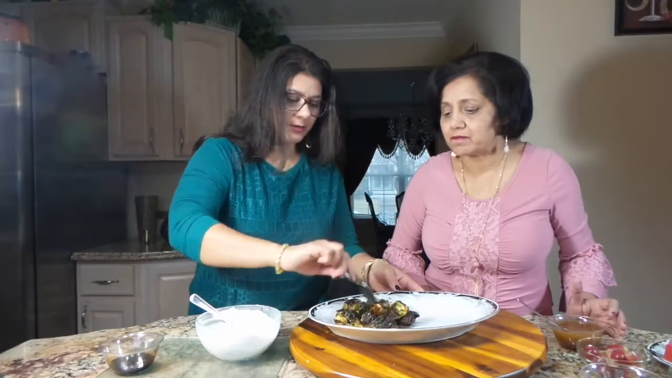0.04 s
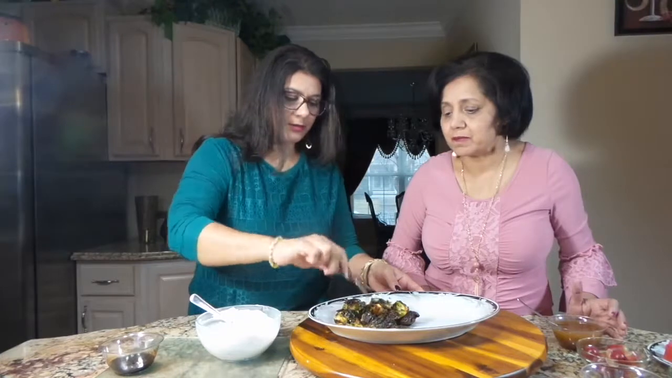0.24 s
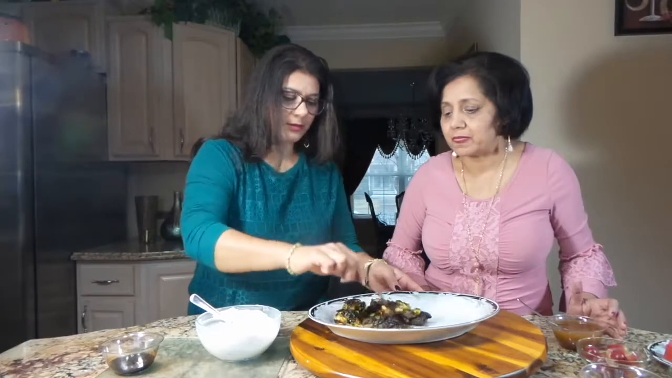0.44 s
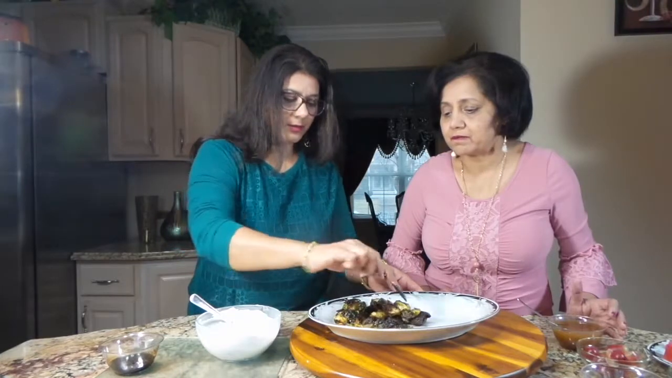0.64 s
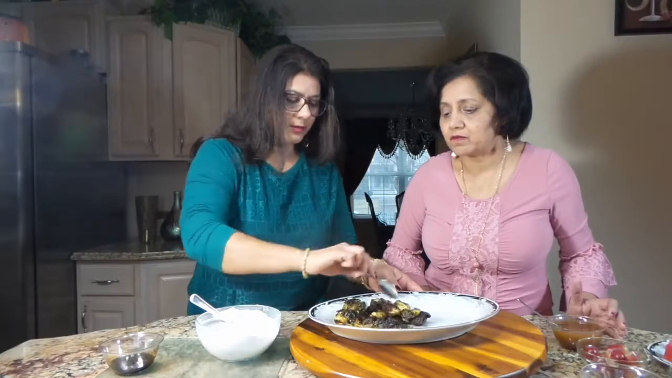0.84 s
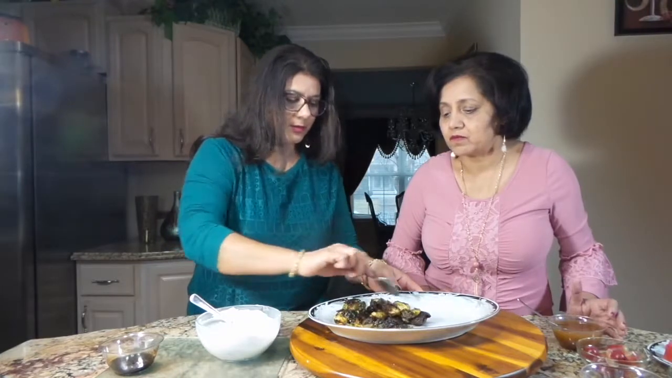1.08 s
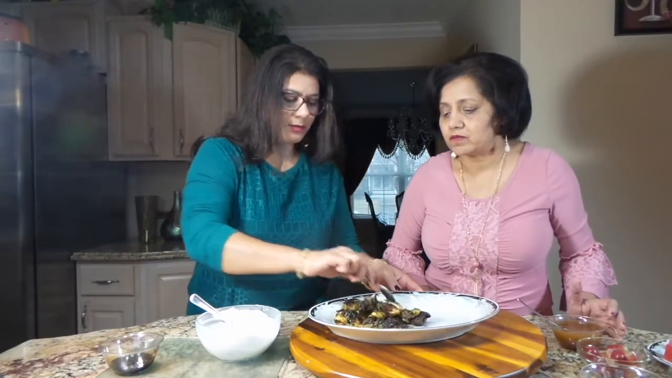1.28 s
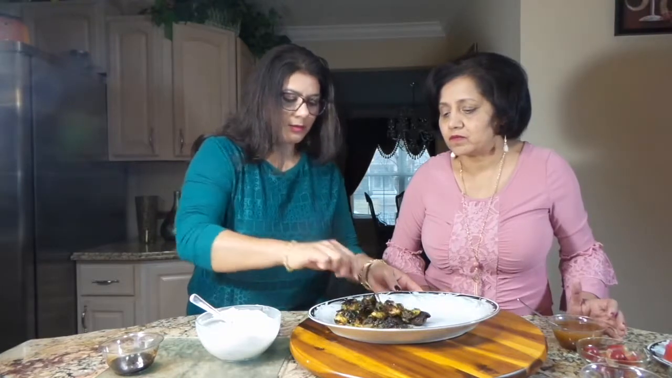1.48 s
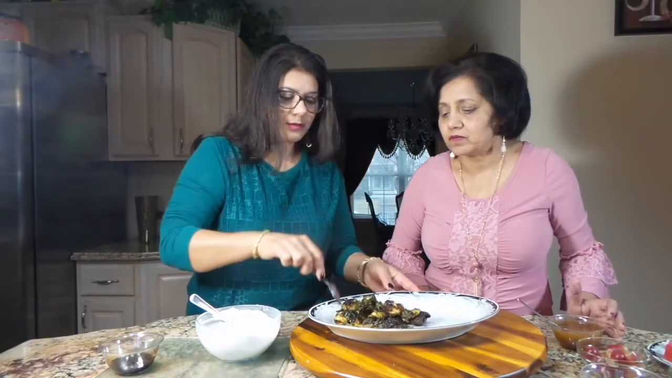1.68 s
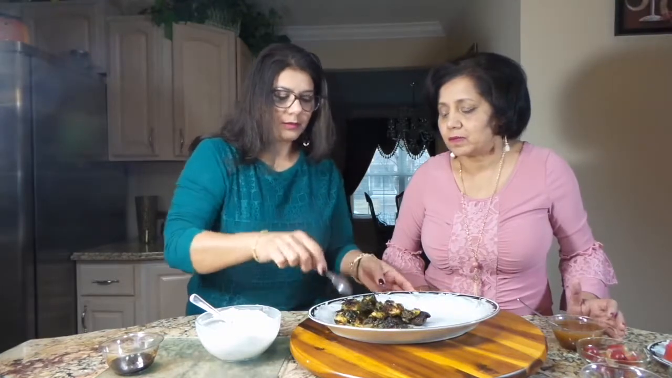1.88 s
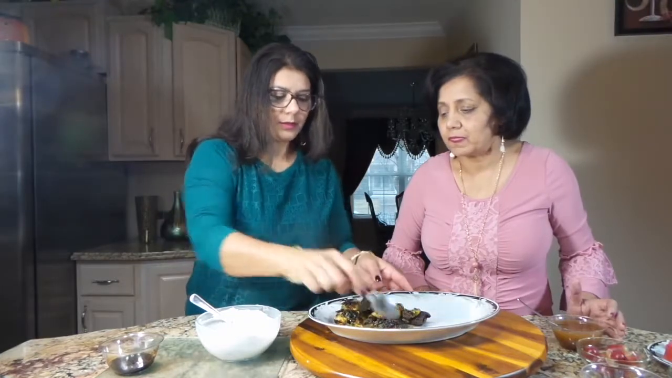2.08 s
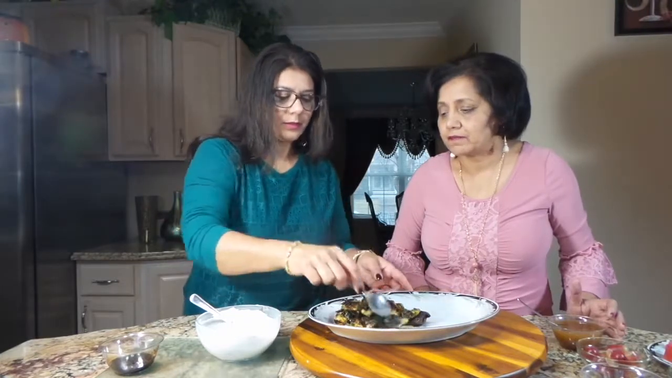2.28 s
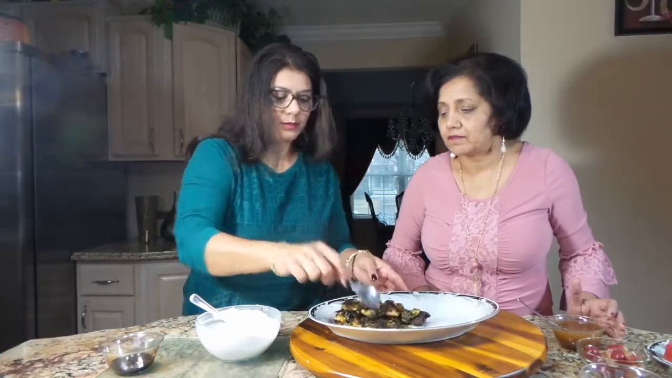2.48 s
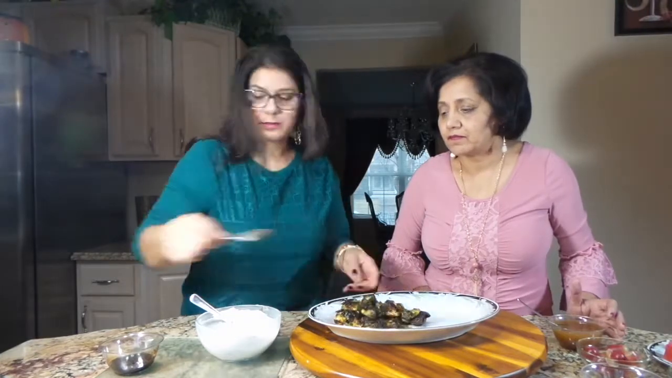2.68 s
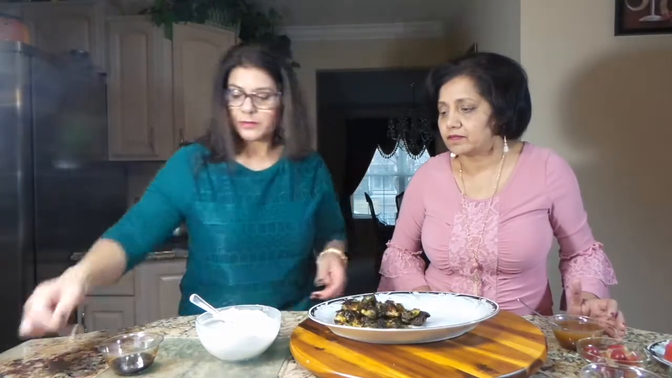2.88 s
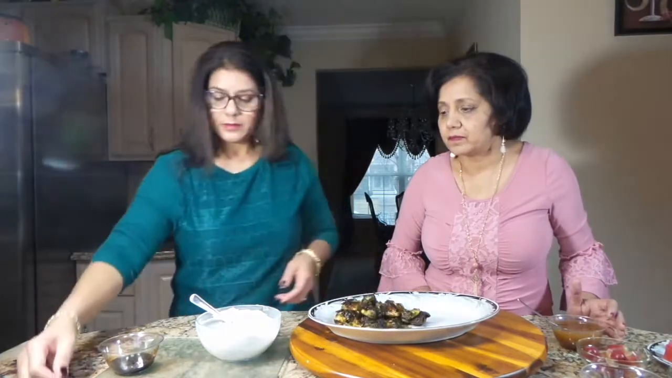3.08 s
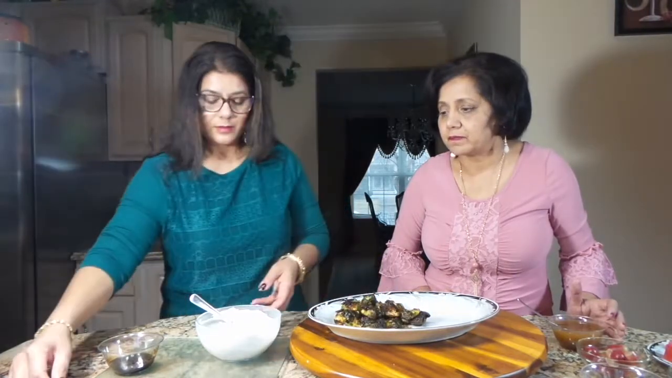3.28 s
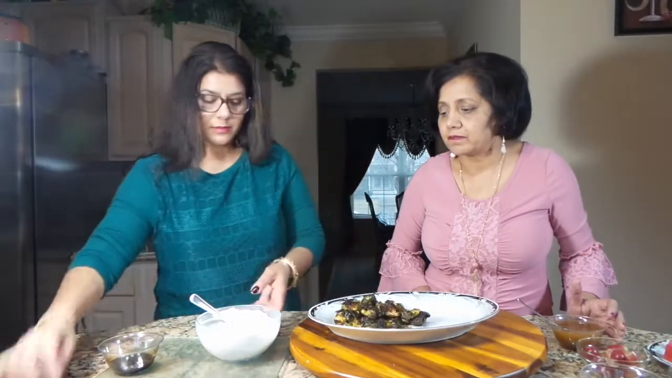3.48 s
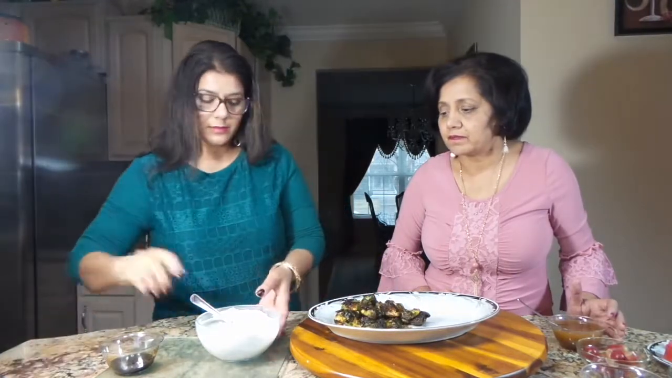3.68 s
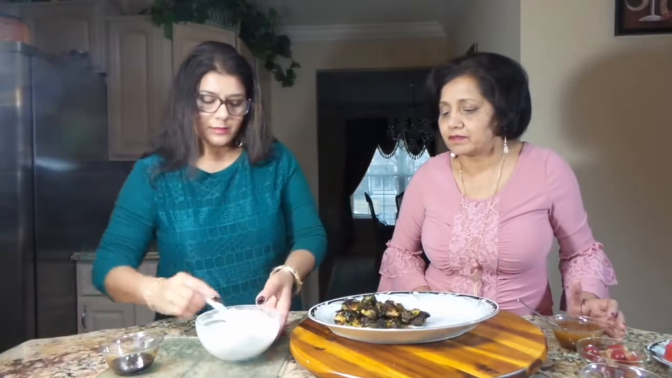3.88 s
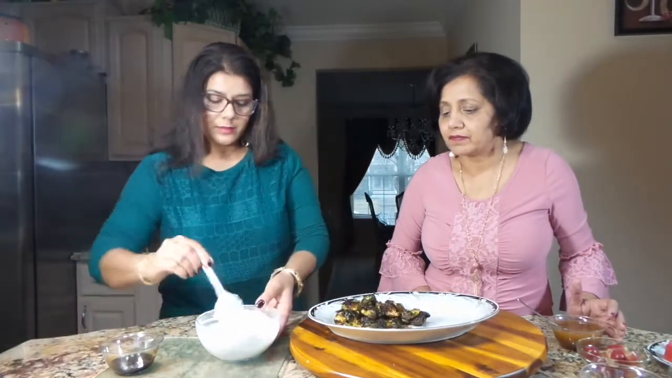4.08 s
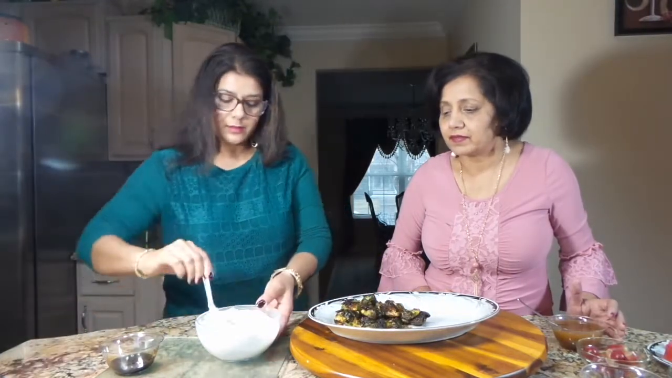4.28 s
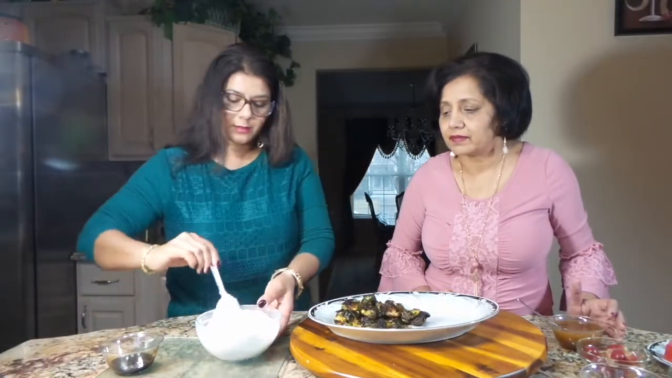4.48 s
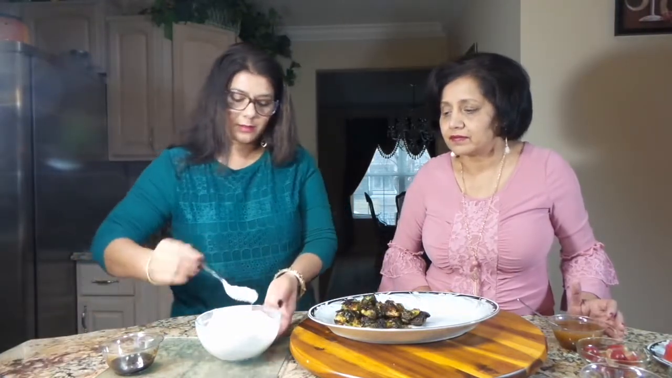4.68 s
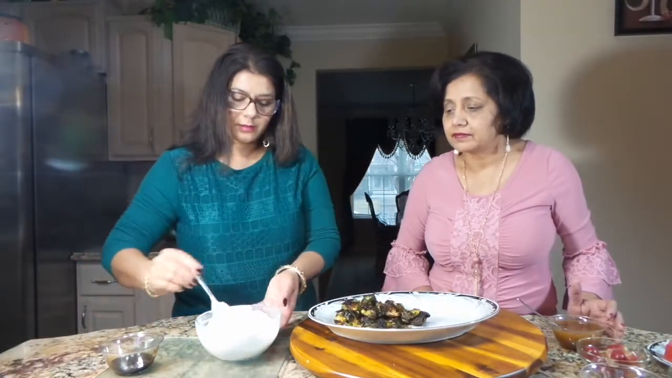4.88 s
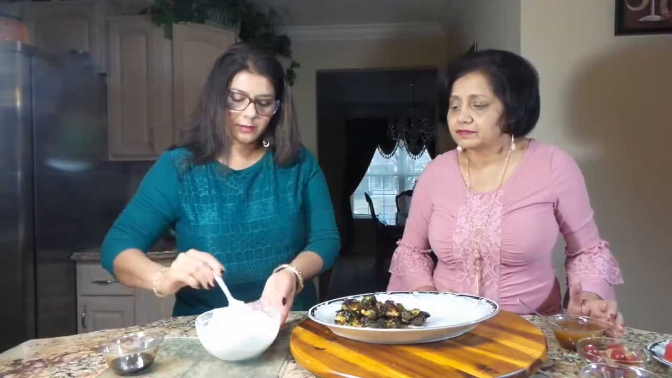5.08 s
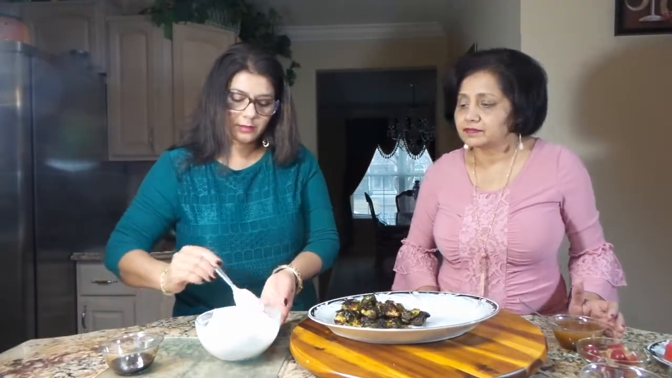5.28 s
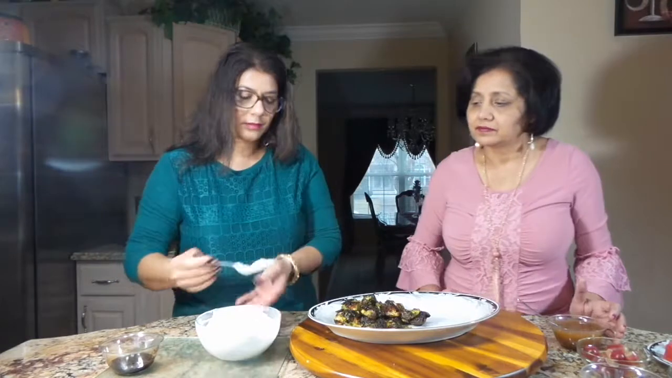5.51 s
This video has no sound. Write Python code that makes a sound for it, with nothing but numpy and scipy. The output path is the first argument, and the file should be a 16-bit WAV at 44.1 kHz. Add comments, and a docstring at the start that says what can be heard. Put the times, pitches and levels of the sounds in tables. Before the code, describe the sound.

In a quiet live kitchen, heard from a few steps away and nearly mono, a metal spoon clinks brightly on a ceramic platter about once a second, with soft moist food rustles between. The spoon then drops on a stone counter, bouncing and rattling sharply to rest, the loudest event. Faint small-spoon taps and short scrapes in a sauce bowl follow over low room rumble.

```python
"""A live kitchen, heard almost in mono from a few steps away: a steel serving spoon knocks food off
onto a large ceramic platter, then is dropped on a stone counter, where it rattles to rest.
A smaller spoon scoops sauce in a hand-held bowl. Soft food rustles and bumps lie between the blows.
Struck things are damped modes plus a crack of coloured noise; food and scraping are streams of uneven
grains. Everything but the room air passes through a diffuse kitchen reverberation."""
import sys
import numpy as np
from scipy import signal
from scipy.fft import rfft, irfft, next_fast_len
from scipy.io import wavfile
from scipy.ndimage import uniform_filter1d, minimum_filter1d

SR = 44100
rng = np.random.default_rng(int(sys.argv[2]) if len(sys.argv) > 2 else 0)


def wrap_up_sound(samples):
    """Save the sound to the file named by the first command line argument, as 16-bit audio."""
    columns = np.atleast_2d(samples).T
    # keep every value between -1 and 1, then stretch to whole-number steps
    tamed = np.clip(columns, -1, 1)
    steps = np.round(tamed * 32767).astype(np.int16)
    wavfile.write(sys.argv[1], SR, steps)


N = 244679

# Ringing modes of the ceramic platter. Each row: frequency in Hz, undamped t60 in seconds,
# relative level in dB when struck on the rim, the same in dB when struck in the well.
PLATTER_MODES = [(781, .14, -13, 0), (860, .05, -14, -7), (1020, .05, -14, -14), (1569, .24, -4, -3),
                 (1590, .16, -9, -14), (1616, .18, -14, -4), (2402, .12, -3, -15), (2458, .15, 3, -5),
                 (2982, .07, -11, -24), (3391, .3, 1, -5), (4413, .18, -4, -10), (5521, .22, -4, -8),
                 (6709, .18, -4, -27), (7981, .2, -4, -23), (8645, .2, -18, -10), (9304, .16, -7, -17),
                 (10260, .1, -16, -18), (10705, .16, -10, -16), (11810, .08, -15, -11),
                 (12190, .14, -15, -19), (13770, .1, -15, -24), (14840, .05, -5, -6)]
# Contact crack on the platter. Each row: frequency in Hz, spectrum in dB per Hz.
PLATTER_CRACK = [(40, -50.5), (150, -28), (420, -23), (700, 18), (1050, -3), (1300, -7.5), (1750, 7),
                 (2800, -12.5), (3900, -1.5), (4800, 6), (7000, 0.5), (13000, 6), (15500, 2.5)]
# Spoon blows on the platter. Each row: start in seconds, ring level in dB, crack level in dB,
# place from 0 (rim) to 1 (well), contact cut-off in Hz.
PLATTER_BLOWS = [(-.14, -35, -27.5, 0, 10500), (.9120, -32, -30.5, 0.078, 16000),
                 (2.2106, -35, -33, 1, 19400)]
PLATTER_THUD_HZ, PLATTER_THUD_DB = 240, -27  # the board under the platter, level against the crack

# Bending modes of the serving spoon's handle. Each row: frequency in Hz, t60 in seconds, relative level in dB.
HANDLE_MODES = [(410, .15, -8), (740, .05, -13), (1058, .1, -4), (1400, .08, -9), (1665, .1, -6),
                (2100, .06, -4), (2270, .06, -1), (2490, .08, -5), (2740, .1, -4), (3105, .1, -6),
                (3490, .08, 0), (3812, .08, 2), (3968, .08, -5), (4400, .08, -3), (4830, .1, -6),
                (5325, .13, -3), (5620, .12, -9), (6260, .08, -7), (6525, .13, -8), (7305, .16, -8),
                (7742, .15, -4), (8147, .13, -7), (8560, .13, -6)]
# Shell modes of the spoon's cup. Each row: frequency in Hz, undamped t60 in seconds, relative level in dB.
CUP_MODES = [(10247, .07, -3), (10465, .07, -9), (11310, .07, -15), (11828, .1, -2), (13910, .04, 0),
             (14050, .04, -10), (14712, .05, -8), (14834, .05, -6)]
# Contact crack of steel on stone. Each row: frequency in Hz, spectrum in dB per Hz.
STONE_CRACK = [(150, -30), (340, -22), (600, -4.5), (1100, 3.5), (1600, 0.5), (2600, 3), (3800, 8.5),
               (5000, 5.5), (8000, 3), (10000, -3.5), (15000, -8.5)]
# Landings of the dropped spoon. Each row: start in seconds, clack level in dB, cup ring level in dB,
# most excited frequency in Hz, lower edge of the sound in Hz, contact cut-off in Hz.
SPOON_LANDINGS = [(3.1560, -33.5, -39, 2303, 450, 13100), (3.171, -36.5, -48.5, 2259, 1000, 5040),
                  (3.2123, -30, -53.5, 5316, 400, 5530), (3.2215, -26.5, -56.5, 2564, 385, 5005),
                  (3.455, -37.5, -66.5, 3740, 501.6, 3475), (3.4627, -21.5, -19, 3974, 3305, 17570),
                  (3.4855, -23.5, -34.5, 2452, 403.7, 9760), (3.507, -29, -30, 1093, 400, 4000),
                  (3.5135, -19.5, -28.5, 4456, 500, 9015), (3.5215, -28, -25.5, 1196, 505, 12040),
                  (3.5570, -23.5, -15.5, 7735, 1200, 16080)]
# Rocking from side to side after a landing. Each row: start in seconds, length in seconds,
# first gap in seconds, first clack level in dB, first cup ring level in dB,
# centre of the most excited frequency in Hz, contact cut-off in Hz.
SPOON_ROCKS = [(3.27, .075, .031, -36.5, -64, 1900, 3188), (3.5305, .128, .0145, -29, -19.5, 4613, 11350)]
HANDLE_BODY_DB, HANDLE_BODY_HZ = 5.5, 900  # the whole handle bends and lifts the modes below this
COUNTER_THUD_HZ, COUNTER_THUD_DB = 136, -30.5  # the counter under the spoon, level against the clack
ROCK_GAP_KEPT = 0.99  # share of the gap kept from swing to swing, before the unevenness
ROCK_FADE_DB_PER_S, CUP_FADE_DB_PER_S = 56.5, 115
ROCK_FOCUS_OCTAVES, ROCK_EDGE_HZ = 0.33, 640  # scatter of the most excited pitch, lower edge of the sound

# Sauce bowl, damped by hand and sauce. Each row: frequency in Hz, t60 in seconds, relative level in dB.
BOWL_MODES = [(721, .03, -9), (904, .04, -6), (1065, .05, -11), (2150, .04, -4), (2270, .08, 4),
              (2410, .03, -6), (3080, .03, -15), (4020, .04, -12), (4500, .02, -16), (5600, .03, -13),
              (5960, .04, -12), (8055, .03, -18)]
# Contact crack in the bowl. Each row: frequency in Hz, spectrum in dB per Hz.
BOWL_CRACK = [(60, -11), (420, -11.5), (780, 19), (1450, -5.5), (2400, 10.5), (3200, 1.5), (5800, -0.5),
              (9000, -9), (15000, -9.5)]
# Small spoon tapping the bowl. Each row: start in seconds, ring level in dB, crack level in dB.
BOWL_TAPS = [(4.507, -70.5, -70), (4.572, -79, -69.5), (4.648, -53, -58), (4.6670, -70, -59.5),
             (5.2376, -55, -50.5), (5.3290, -58.5, -62), (5.3635, -60.5, -57.5)]
# Scoops along the bowl's wall. Each row: start in seconds, length until release in seconds, level in dB.
SCOOPS = [(4.513, 0.122, -69), (4.628, 0.028, -53), (4.67, 0.029, -65), (5.253, 0.11, -54.5)]
SCOOP_ATTACK_S, SCOOP_RELEASE_S = 0.013, 0.013

# Moist food sliding and dropping. Each row: peak of the swell in seconds, rise in seconds (the fall is
# as long), level in dB, treble tilt in dB per octave.
RUSTLES = [(0.122, 0.059, -46, -2.5), (0.38, 0.11, -59, -1.5), (0.621, 0.016, -65, 1.5),
           (1.319, 0.06, -62.5, -3), (1.83, 0.1, -68, -3.5), (2.449, 0.052, -57, -4.5),
           (4.415, 0.031, -67, 6)]
# Spectrum of the food before the tilt. Each row: frequency in Hz, spectrum in dB per Hz.
FOOD_COLOUR = [(40, -36.5), (200, 0.5), (800, -8), (2500, -2.5), (5000, -2), (9000, -1.5), (15000, 6)]
# Dishes and hands on the board and counter. Each row: start in seconds, frequency in Hz, level in dB.
BUMPS = [(0.03, 124, -58.5), (0.148, 160, -59), (1.80, 243, -62), (1.87, 260, -60), (2.066, 195, -63),
         (2.189, 199, -55), (2.384, 138, -55.5), (3.735, 119, -52.5), (3.954, 1190, -67)]

# Air of the room at the microphone. Each row: frequency in Hz, spectrum in dB per Hz.
AIR_COLOUR = [(15, -49.5), (25, -18.5), (48, -1.5), (107, -2.5), (144, -2.5), (188, -1), (260, -5),
              (297, -2.5), (433, -9.5), (631, -8.5), (1110, -16), (1340, -14), (1620, -20.5), (1750, -20),
              (15500, -26.5)]
AIR_DB = -63.5
# Kitchen reverberation. Each row: band centre in Hz, t60 in seconds.
ROOM_T60 = [(125, .55), (500, .45), (1500, .43), (4000, .38), (8000, .325), (15000, .24)]
TOP_HZ = 15600
BASS_LAG_S = .018  # delay of the averaged loudness that thins the bass
TAIL = 32768  # samples in each struck sound
AGE = np.arange(TAIL) / SR  # seconds since its start


def platter(damping=9, choked_db=-6, free_db=-1, food_damping=0.92):
    """The spoon cracks against the platter; the place of the blow sets the balance of the ringing modes."""
    out = np.zeros(N)
    _, _, rim_db, well_db = np.transpose(PLATTER_MODES)
    for s, ring_db, crack_db, place, cut_hz in PLATTER_BLOWS:
        path = kitchen(direct_db=-12, early_db=-6.0)
        # part of each mode dies at once under the touching spoon, the rest rings freely
        free = ringing(PLATTER_MODES, kitchen(), food_damping)
        choked = ringing(PLATTER_MODES, path, damping)
        rows = undb(free_db) * free + undb(choked_db) * choked
        mode_db = rim_db + np.clip(place, 0, 1) * (well_db - rim_db)
        ring = undb(mode_db) @ rows
        crack = unit(colour(path, PLATTER_CRACK, cut_hz))
        add(out, s, radiate(undb(ring_db) * ring + undb(crack_db) * crack, edge_hz=770))
        add(out, s, undb(crack_db + PLATTER_THUD_DB) * thud(PLATTER_THUD_HZ))
    return out


def dropped_spoon(focus_db=9, focus_octaves=0.33, crack_db=-1, cup_damping=1.25, choked_damping=25, choked_db=-10):
    """The handle bends and clacks on the stone; each blow also rings the cup's high shell modes by its own amount."""
    out, path = np.zeros(N), kitchen(direct_db=-10, early_db=-3, early_t60=.035)
    handle, counter = ringing(HANDLE_MODES, path), thud(COUNTER_THUD_HZ)
    # the stone chokes part of the cup's ring at once
    free_cup = ringing(CUP_MODES, path, cup_damping)
    cup = free_cup + undb(choked_db) * ringing(CUP_MODES, path, choked_damping)
    handle_hz = np.array(HANDLE_MODES)[:, :1]
    body_db = HANDLE_BODY_DB / (1 + (handle_hz / HANDLE_BODY_HZ) ** 4)
    for s, clack_db, cup_db, focus_hz, edge_hz, cut_hz in SPOON_LANDINGS + rocking():
        # the point that touches the stone favours the modes that swing most there
        octaves_off = np.log2(handle_hz / focus_hz)
        favour = undb(body_db + focus_db * np.exp(-(octaves_off / focus_octaves) ** 2))
        softness = np.sqrt(1 + (handle_hz / cut_hz) ** 4)
        bending = unit(blow(HANDLE_MODES, favour * handle / softness))
        crack = unit(colour(path, STONE_CRACK, cut_hz))
        clack = unit(bending + undb(crack_db) * crack)
        sound = undb(clack_db) * clack + undb(cup_db) * unit(blow(CUP_MODES, cup))
        push = undb(clack_db + COUNTER_THUD_DB) * counter
        # the spoon rocks, so blows come from either side: random polarity
        add(out, s, rng.choice([-1, 1]) * (radiate(sound, edge_hz, order=2) + push))
    return out


def rocking(count=16, uneven=.12, scatter_db=3.0):
    """Blows of the rocking spoon: on average ever quicker and weaker, each on a slightly different point."""
    blows = []
    for start, length, gap, clack_db, cup_db, focus_hz, cut_hz in SPOON_ROCKS:
        age = 0
        for swing, (late, force, point) in enumerate(rng.standard_normal((count, 3))):
            if age < length:
                swing_clack_db = clack_db - ROCK_FADE_DB_PER_S * age + scatter_db * force
                swing_cup_db = cup_db - CUP_FADE_DB_PER_S * age
                swing_focus_hz = focus_hz * 2 ** (ROCK_FOCUS_OCTAVES * point)
                blows.append((start + age, swing_clack_db, swing_cup_db, swing_focus_hz, ROCK_EDGE_HZ, cut_hz))
            age += gap * ROCK_GAP_KEPT ** swing * (1 + uneven * late)
    return blows


def sauce_bowl(grit_db=-3):
    """A small spoon taps the bowl and drags along its wall in tiny slips that set its damped modes ringing."""
    out, path = np.zeros(N), kitchen(direct_db=-4.5, early_db=3, early_t60=0.028)
    rows, crack = ringing(BOWL_MODES, path), unit(colour(path, BOWL_CRACK))
    for s, ring_db, crack_db in BOWL_TAPS:
        add(out, s, undb(ring_db) * unit(blow(BOWL_MODES, rows)) + undb(crack_db) * crack)
    slips = grains(N, spread_db=3.5) * scoop_pressure()
    wall = unit(blow(BOWL_MODES, rows)) + undb(grit_db) * crack
    return out + signal.fftconvolve(slips, wall / np.linalg.norm(wall))[:N]


def scoop_pressure():
    """In each scoop the spoon presses on, holds and lets go."""
    t = np.arange(N) / SR
    pressure = np.zeros(N)
    for s, length, db in SCOOPS:
        press = np.clip((t - s) / SCOOP_ATTACK_S, 0, 1)
        release = np.exp(-np.maximum(t - s - length, 0) / SCOOP_RELEASE_S)
        pressure += undb(db) * press * release
    return pressure


def food():
    """Brief swells of moist crackle, made of uneven grains, as pieces slide."""
    out = np.zeros(N)
    for s, rise, db, tilt_db in RUSTLES:
        swell = np.sin(np.pi / 2 * np.minimum(AGE / rise, 2)) ** 2
        path = colour(kitchen(), FOOD_COLOUR, tilt_db=tilt_db)
        crackle = signal.fftconvolve(grains(TAIL, spread_db=4.5) * swell ** 2, path)[:TAIL]
        add(out, s - rise, undb(db) * unit(crackle))
    return out


def bumps():
    """Dishes and hands nudge the board and the counter, each a short soft thud."""
    out = np.zeros(N)
    for s, hz, db in BUMPS:
        add(out, s, undb(db) * thud(hz))
    return out


def room_air(side_db=-19):
    """Low rumble of the house under a faint even hiss, slightly different left and right."""
    mid, side = (colour(rng.standard_normal(N), AIR_COLOUR) for _ in range(2))
    left_right = np.array([[1], [-1]])
    return undb(AIR_DB) * (mid + undb(side_db) * side * left_right) / np.std(mid)


def kitchen(direct_db=-10, early_db=-4, early_t60=0.052):
    """A path to the microphone: direct sound, near reflections off the counter, a tail that loses its treble."""
    hz = np.arange(TAIL // 2 + 1) * SR / TAIL
    noise = rfft(rng.standard_normal(TAIL))
    centres, t60s = np.transpose(ROOM_T60)
    tail = np.zeros(TAIL)
    # overlapping bands of one noise, each with its own decay
    for share, t60 in zip(np.eye(len(centres)), t60s):
        band = irfft(noise * on_log_axis(np.c_[centres, share], hz))
        tail += band * undb(-60 * AGE / t60)
    sparks = rng.standard_normal(TAIL) * rng.exponential(size=TAIL)
    early = sparks * np.exp(-np.log(1000) * AGE / early_t60)
    direct = 1. * (AGE == 0)
    return unit(tail) + undb(early_db) * unit(early) + undb(direct_db) * unit(direct)


def ringing(modes, path, damping=1):
    """Each mode as a damped sine heard along a path through the room, one row a mode."""
    hz, t60 = np.array(modes).T[:2, :, None]
    sines = np.sin(2 * np.pi * hz * AGE) * np.exp(-np.log(1000) * damping * AGE / t60)
    return unit(signal.fftconvolve(sines, path[None], axes=1)[:, :TAIL])


def blow(modes, rows):
    """Every blow lands on a slightly different spot and shares its energy differently among the modes."""
    scatter_db = 3 * rng.standard_normal(len(modes))
    return undb(np.array(modes)[:, -1] + scatter_db) @ rows


def thud(hz, t60=0.019):
    """A soft push gives a few cycles that linger in the room."""
    return radiate(ringing([(hz, t60)], kitchen())[0], hz / 2)


def grains(size, spread_db):
    """Dense tiny slips of very uneven strength."""
    x = rng.standard_normal(size) * undb(spread_db * np.minimum(rng.exponential(size=size), 2 * np.pi))
    return x / np.std(x)


def radiate(x, edge_hz, order=3):
    """Small objects hardly radiate below an edge frequency."""
    return signal.sosfilt(signal.butter(order, edge_hz, "high", fs=SR, output="sos"), x)


def colour(x, points, cut_hz=np.inf, tilt_db=0):
    """Causal minimum-phase filter from a spectrum, a contact low-pass and a treble tilt in dB per octave."""
    size = next_fast_len(len(x), True)
    size += size % 2
    hz = np.arange(size // 2 + 1) * SR / size
    spectrum_db = on_log_axis(points, hz) + tilt_db * np.log2(1 + hz / 10 ** 3)
    gain = undb(spectrum_db) / np.sqrt(1 + (hz / cut_hz) ** 4)
    # fold the cepstrum onto positive times, so nothing sounds early
    cepstrum = irfft(np.log(gain))
    cepstrum[1:size // 2] *= 2
    cepstrum[size // 2 + 1:] = 0
    return irfft(rfft(x, size) * np.exp(rfft(cepstrum)))[:len(x)]


def on_log_axis(points, hz):
    """Read (Hz, value) points at the given frequencies."""
    f, value = np.transpose(points)
    return np.interp(np.log(hz + 1), np.log(f), value)


def undb(db):
    """Decibels to gain."""
    return 10 ** (np.asarray(db) / 20)


def unit(x):
    """Scale a short sound to the energy of a tenth of a second at rms 1."""
    return x / np.sqrt(np.sum(x ** 2, axis=-1, keepdims=True) * 10 / SR)


def add(out, s, sound):
    """Mix a sound in at time s; it may have begun before the start."""
    start = int(round(s * SR))
    lo, hi = max(start, 0), min(start + len(sound), N)
    out[lo:hi] += sound[lo - start:hi - start]


def thin_bass(x, threshold_db=-17.0, edge_hz=365, window_s=.055):
    """Thin out the sound below edge_hz while the averaged sound stays loud."""
    power = uniform_filter1d(x[0] ** 2, int(window_s * SR)) / undb(threshold_db) ** 2
    loudness = np.interp(np.arange(N) - BASS_LAG_S * SR, np.arange(N), power)
    bass_kept = 1 / (1 + np.abs(loudness) ** 10)
    upper = signal.sosfiltfilt(signal.butter(10, edge_hz, "high", fs=SR, output="sos"), x)
    return upper + bass_kept * (x - upper)


def scene():
    """All the handling happens straight ahead of the microphone; only the room air has width."""
    return platter() + dropped_spoon() + sauce_bowl() + food() + bumps() + room_air()


def record(dry):
    """The crash of the spoon is thin in the bass, a fast limiter holds the loudest peaks, and the top is cut."""
    ceiling, hold = .63, int(.004 * SR)  # full scale is 1; hold in samples
    sound = thin_bass(dry)
    room_left = ceiling / np.maximum(np.abs(sound).max(axis=0), ceiling)
    gain = uniform_filter1d(minimum_filter1d(room_left, hold), hold)
    top_cut = signal.ellip(10, .2, 80, TOP_HZ, fs=SR, output="sos")
    return signal.sosfilt(top_cut, sound * gain)


dry = scene()
out = record(dry)
wrap_up_sound(out)
```